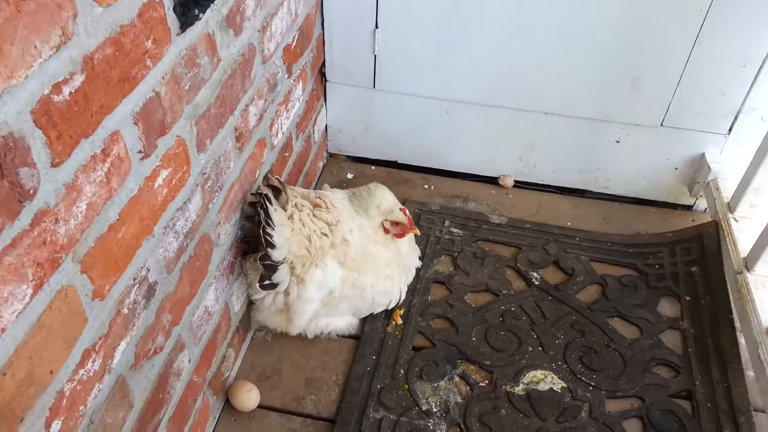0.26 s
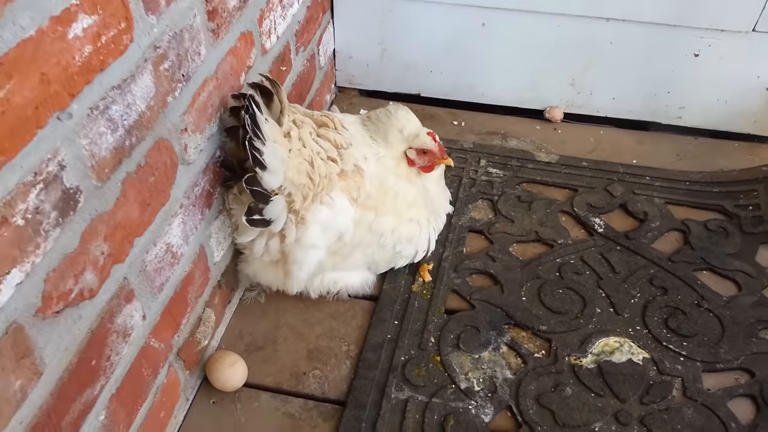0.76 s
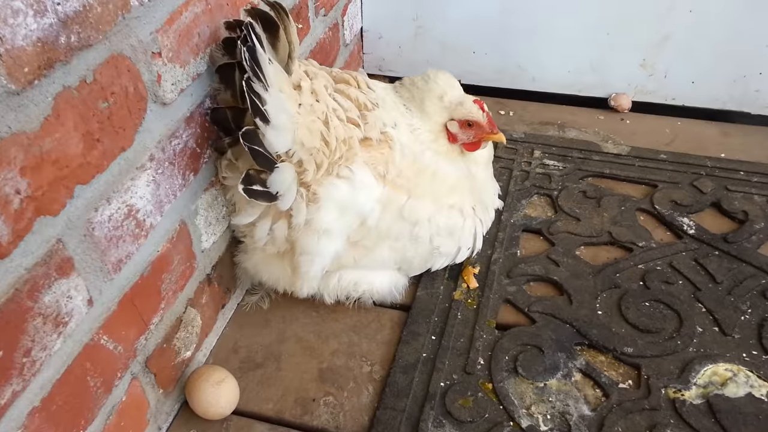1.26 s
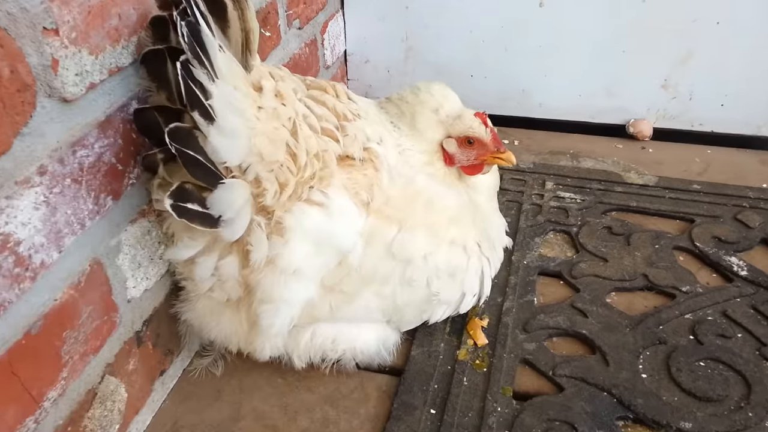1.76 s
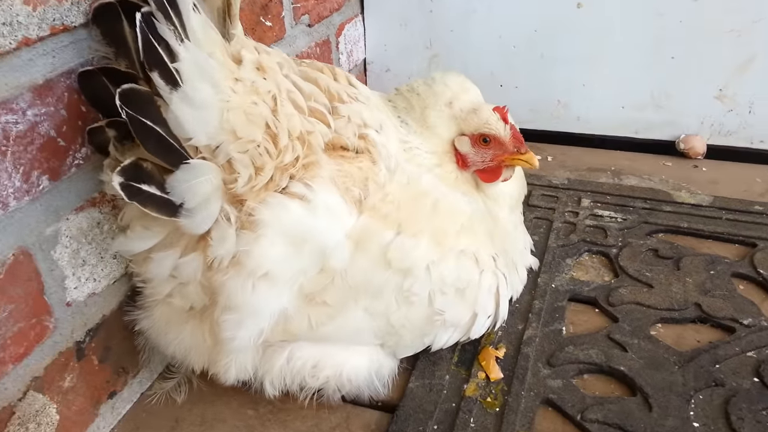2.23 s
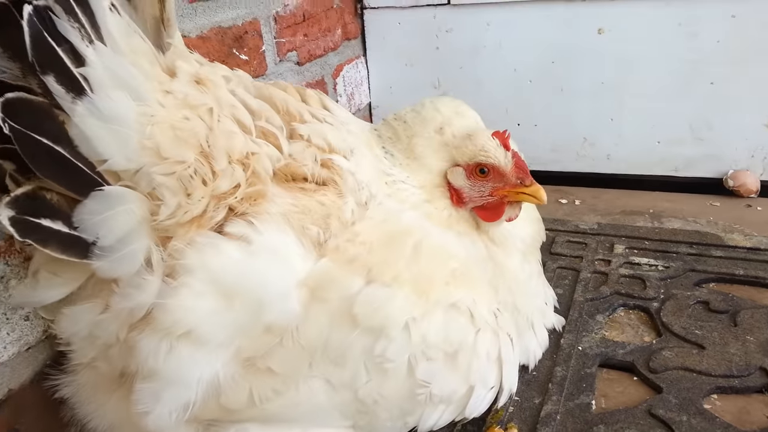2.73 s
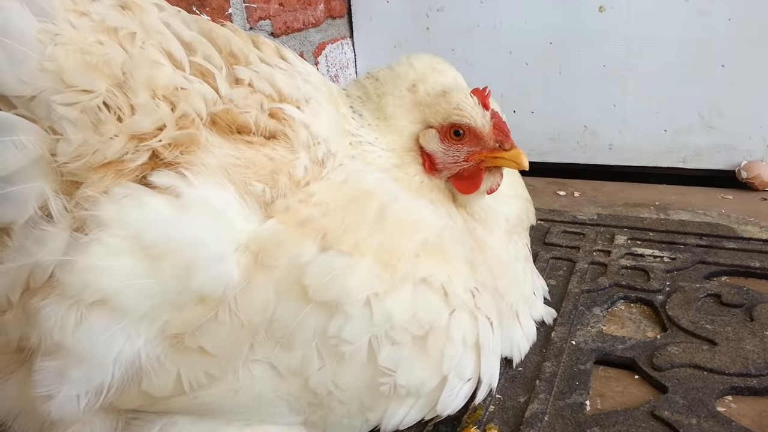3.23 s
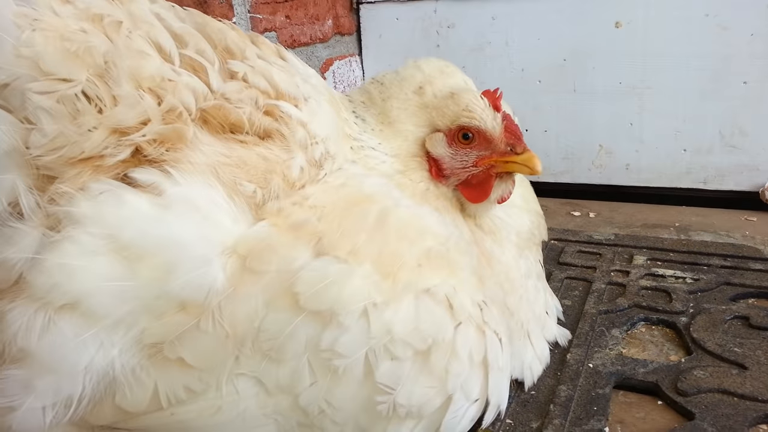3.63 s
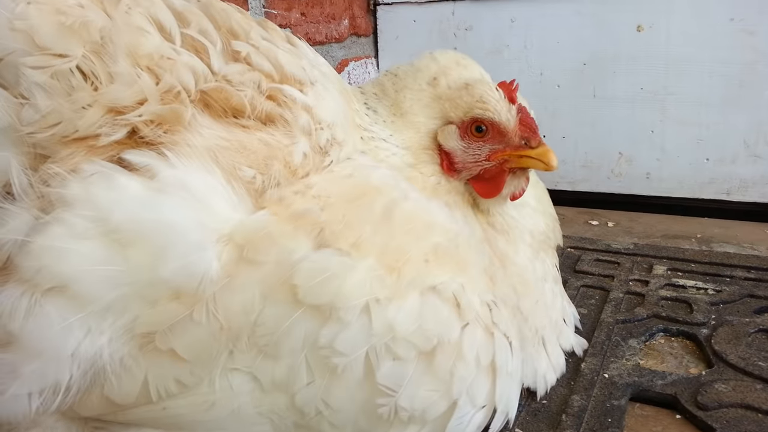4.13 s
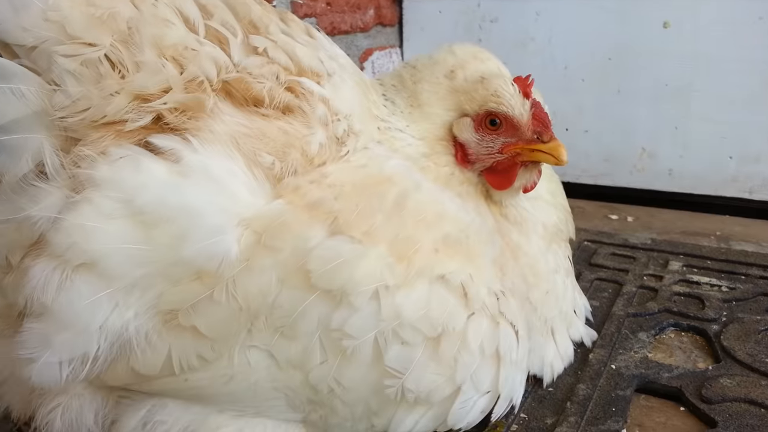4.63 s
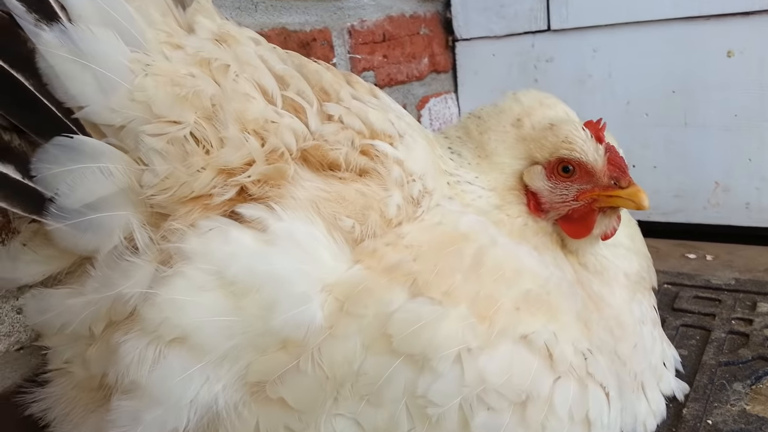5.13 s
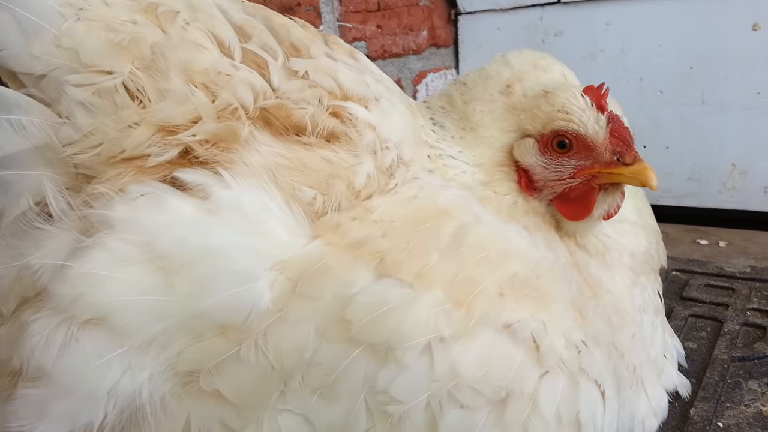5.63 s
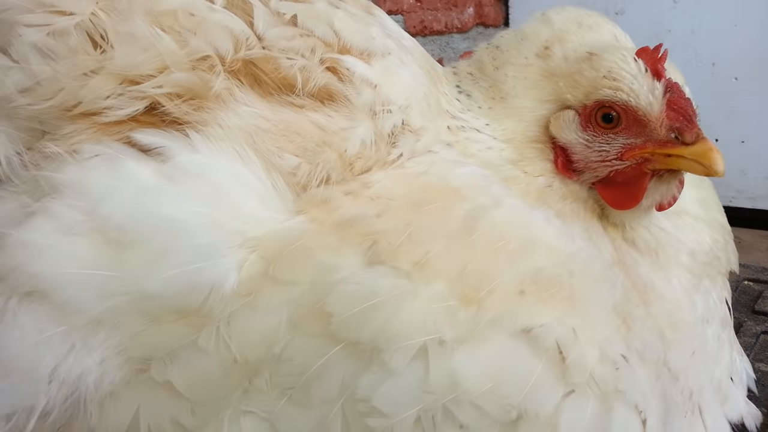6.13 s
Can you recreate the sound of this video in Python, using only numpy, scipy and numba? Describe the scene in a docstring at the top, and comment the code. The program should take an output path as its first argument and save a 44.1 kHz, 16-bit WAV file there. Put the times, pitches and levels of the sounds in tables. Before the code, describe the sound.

A broody hen on a porch gives soft clucks, a swelling throaty wavering moan, then two louder stuttering calls over faint engine idle.

```python
"""A soft outdoor hush, a far engine idling and small rustles come first; then a broody hen on a brick porch calls.
She gives four calls: her breath comes in short throbs, each a note that climbs fast and sags, first as
separate clucks, later fused to a wavering moan. Her voice is harmonics and sharp pulses shaped by throat and beak.
Ticks ring a few resonances, rustles are swells of grainy noise, the engine is thumps ringing a pipe,
the hush is smooth noise; the porch adds a short tail to hen and ticks."""
import sys
import numpy as np
from scipy import signal
from scipy.fft import rfft, irfft
from scipy.io import wavfile
from scipy.ndimage import uniform_filter1d
from numba import njit

SR = 44100
rng = np.random.default_rng(int(sys.argv[2]) if len(sys.argv) > 2 else 0)


def put_to_file(sound):
    """Save the sound as 16-bit audio at rate SR, in the file named by the first command-line argument."""
    columns = np.atleast_2d(sound).T  # one column per channel
    safe = np.clip(columns, -1, 1)
    whole_steps = np.round(safe * 32767)
    wavfile.write(sys.argv[1], SR, whole_steps.astype(np.int16))


N = 281358

# how the throat colours the low harmonics: [f/Hz, level/dB]
THROAT = [(250, -12.5), (350, 6.5), (420, 0), (500, 2.4), (720, 10), (1030, 0.5), (1180, -6), (1330, -25.5),
          (1700, -40)]
# beak resonances, and last a narrow windpipe resonance that also follows the beak opening: [f/Hz, width/Hz,
# level/dB, how far it follows the opening]
BEAK = [(3193, 326, -26, 0.83), (3707, 414, -18.5, 1.65), (4585, 1250, -29, 1.49), (1804, 150, -30.5, 3.18)]
# windpipe resonances: [f/Hz, width/Hz, level/dB, how far it follows the opening]
WINDPIPE = [(1465, 150, -32, 2.04), (1942, 580, -24, 0.74)]
# resonances of whistling air: [f/Hz, width/Hz, level/dB]
WHISTLE = [(6380, 62, -34.5), (8400, 1000, -45.5), (10120, 400, -40.5), (13320, 400, -49)]
# beak resonances shift with its shape: [t/s, share of rest pitch]
BEAK_TUNING = [(1.43, 0.89), (1.7, 0.97), (2.24, 0.98), (2.5, 0.98), (3.15, 0.91), (5.5, 1), (5.7, 0.94)]
# how her voice wavers: [t/s, pitch sag as a share, roughness 0-1]
WAVER = [(.31, .12, .45), (.45, .3, .2), (1.33, 0, .1), (1.37, .22, .15), (1.42, .12, .4), (1.5, .15, .6),
         (1.64, .08, .5), (1.68, .06, .07), (1.79, .07, .1), (1.825, .05, .34), (1.86, .08, .1),
         (1.95, .15, .08), (2.145, .08, .08), (2.165, .15, .5), (2.21, .1, .12), (2.33, .18, .14),
         (2.5, .2, .15), (2.56, .4, .3), (3.1, -.08, .07), (3.15, .2, .05), (3.46, .22, .05),
         (3.52, .36, .08), (3.66, .3, .25), (5.12, .2, .3), (5.16, .25, .1), (5.32, .4, .15),
         (5.47, .38, .25), (5.62, .36, .06), (5.76, .23, .05), (5.92, .33, .15)]
# colour of the voice: [t/s, low overtones level/dB, windpipe level/dB, open beak level/dB, whistling air level/dB]
COLOUR = [(.31, -11.5, -2.5, -5, -5.5), (1.33, -26, -13, -8, 0), (1.43, 8, 11.5, 2.5, -13),
          (1.5, -6.5, 13, -7, -6), (1.62, 2, 16.5, 2.5, 2), (1.8, 20.5, 15, 7.5, 1.5),
          (2.0, -0.5, 3.5, 1.5, -10.5), (2.25, 14, 6, 3.5, -5.5), (2.58, 3, 6.5, -2, 2.5),
          (3.05, 10.5, 1, -4.5, -13), (3.1, 7.5, 8, -1, -3), (3.66, 3.5, -0.5, -9, -3.5),
          (5.09, 8, -3, -6, -3.5), (5.45, -2, -5.5, -9.5, -9), (5.75, -5.5, -4, -8.5, -15.5)]
# the other half of the syrinx (the bird's voice box) sounds its own note: [t/s, f/Hz, level/dB]
SECOND_SIDE = [(1.45, 780, -44), (1.5, 798.5, -34), (1.645, 717.4, -21.5), (1.67, 701.3, -42)]
OVERTONES_FROM_HZ, OVERTONES_FULL_HZ = 743, 1090   # the overtone colour takes hold between these
NO_SAG_BEFORE_DB = 11   # the weaker the next throb, the less this one sags; not at all before a drop this deep
SAG_LIFT_DB = 2.5   # rise in level for a full sag; a wider beak makes it larger
SLACK_DULLS_DB = 34.5   # treble lost in a full sag
HALF_SHARE = 0.045   # how much every second cycle differs, before the beak opening scales it
MOAN_SWELL_DB, SWELL_DB = 2, 4.5   # how far below its top a throb starts: one that runs on, one cut short


def hen():
    """Harmonics of the syrinx pass through throat and beak; rough moments scatter the cycles and add hiss."""
    sag, rough = in_time(WAVER)
    overtones_db, windpipe_db, beak_db, whistle_db = in_time(COLOUR)
    start, level_db, top_hz = throbs()
    progress = np.interp(np.arange(N) / SR, start, np.arange(len(start)))
    throb, part = progress.astype(int), progress % 1   # which throb, and how far through it
    step_db = np.diff(level_db)
    runs_on = np.append(step_db > -12, False)[throb]
    # the final low note is dull and dies away
    last = np.append(level_db[1:] < -60, False)[throb]
    silent = (level_db[throb] < -60) | (progress <= 0)

    # the membranes tighten fast, hold, then slacken; a cluck cut short by a pause ends at full pitch
    sags = np.clip(1 + np.append(step_db, -99) / NO_SAG_BEFORE_DB, 0, 1)[throb]
    tightening = np.clip(1 - np.where(runs_on, 6, 3) * part, 0, 1) ** 1.5
    slackening = sags * np.clip(1.5 * part - .5, 0, 1) ** 1.4
    slack = sag * np.maximum(tightening, slackening)
    pitch = uniform_filter1d(top_hz[throb] * (1 - slack), 70)
    jitter = (.002 + .12 * rough) * wobble(250)
    cycle = 2 * np.pi * np.cumsum(pitch * (1 + jitter)) / SR
    # half-speed wave: every second cycle is stronger, the more so the wider the beak
    uneven = np.clip(HALF_SHARE * from_db(beak_db), 0, .8) * np.cos(cycle / 2)
    shimmer = 1 + rough * wobble(200) + .3 * uneven

    # four smooth harmonics, held at an even level before the breath shapes them
    dull_db = uniform_filter1d(-20. * last, 200)
    low = 0
    for k in (1, 2, 3, 4):
        harmonic_db = at_hz(THROAT, k * pitch)
        if k > 1:
            colour_share = np.interp(k * pitch, [OVERTONES_FROM_HZ, OVERTONES_FULL_HZ], [0, 1])
            harmonic_db = harmonic_db + dull_db + overtones_db * colour_share
        low = low + from_db(harmonic_db) * np.sin(k * (cycle + 1.3) - 1.3)
    low = shimmer * low / np.sqrt(uniform_filter1d(low ** 2, 400) + 1e-9)

    # each closure of the membranes is a sharp pulse, with a puff of turbulent air
    closures = sum(np.cos(k * cycle) for k in range(1, 22)) / 3
    puffs = rng.standard_normal(N) * (1 + .8 * np.cos(cycle))
    buzz = (shimmer + uneven) * closures + (.05 + 2 * rough) * puffs
    high = formants(buzz, WINDPIPE, windpipe_db, np.ones(N))
    high = high + formants(buzz, BEAK, beak_db, in_time(BEAK_TUNING)[0])
    high = high + climbing(buzz)
    high = high + from_db(whistle_db) * resonances(buzz + .5 * puffs, WHISTLE)
    high = above(1450, 5 * high) * uniform_filter1d(from_db(3 - SLACK_DULLS_DB * slack), 100)

    # each throb swells; the breath is slightly louder while the pitch sags
    swell_db = np.where(runs_on, MOAN_SWELL_DB, SWELL_DB) * ~last * np.clip(1 - 0.96 * part, 0, 1)
    sag_lift_db = SAG_LIFT_DB * from_db(beak_db) * slack
    breath = from_db(level_db[throb] + sag_lift_db - 20 * last * part - swell_db) * ~silent
    breath = uniform_filter1d(uniform_filter1d(breath, 200), 120)

    side_hz, side_db = in_time(SECOND_SIDE)
    side_cycle = 2 * np.pi * np.cumsum(side_hz * (1 + 0.0422 * wobble(56))) / SR
    second = from_db(side_db) * shimmer * ~silent * np.sin(side_cycle)
    return above(200, breath * (low + high) + second)


# the four calls, each row starting on a beat:
# [t/s, level/dB, top pitch f/Hz, off-beat minus beat level/dB, share of the beat before the off-beat]
VOICE = [
    [(.315, -31.5, 513, -8.5, 0.55), (.38, -29.5, 526, -6.5, 0.33), (.472, -22, 537.3, -2.5, 0.62),
     (.564, -26.5, 505.5, 0, 0.65), (.657, -25.5, 525, -4, 0.49), (.701, -29.5, 472, 2.5, 0.78)],
    [(1.375, -24, 553, -6.5, 0.4), (1.42, -23.5, 559, -5, 0.49), (1.546, -30.5, 582.6, 5.5, 0.64),
     (1.608, -22.5, 623.2, 2.5, 0.88), (1.657, -21.5, 591.8, -8.5, 0.69), (1.785, -20.5, 627, 7.5, 0.61),
     (1.832, -13.5, 619, -2.5, 0.4), (1.876, -15.5, 601, -0.5, 0.56), (1.924, -19.5, 536, 1, 0.64),
     (2.015, -18.5, 561.5, 1, 0.41), (2.103, -15, 588, -1.5, 0.56), (2.152, -14.5, 640.8, 2.5, 0.5),
     (2.246, -10, 589.3, -3, 0.56), (2.295, -12.5, 527, -1, 0.6), (2.339, -15.5, 532.4, 0, 0.47),
     (2.43, -13, 594.4, 1, 0.36), (2.479, -11, 566.3, -2.5, 0.4), (2.524, -14, 454, -4.5, 0.65)],
    [(3.043, -15.5, 588, -26, 0.29), (3.096, -7.5, 543.4, -28.5, 0.39), (3.154, -5, 536.5, -23, 0.36),
     (3.251, -6, 545.7, -30.5, 0.42), (3.302, -7.5, 529, -6, 0.53), (3.499, -8, 507.7, -4, 0.54),
     (3.546, -11.5, 482.4, 0.93, 0.51), (3.598, -16.5, 457.6, 0, 0.96), (3.622, -17, 328.6, -3, 0.91)],
    [(5.101, -16.5, 521.4, -15, 0.35), (5.159, -11.5, 523.5, -40, 0.36), (5.205, -9, 510.2, -19, 0.38),
     (5.252, -9.5, 524.5, -4.5, 0.63), (5.327, -9, 515, -2, 0.74), (5.42, -9, 502, -4.5, 0.7),
     (5.471, -14, 480.5, -3.5, 0.5), (5.524, -12.5, 490, -0.5, 0.51), (5.62, -14, 498.7, -2, 0.57),
     (5.726, -14, 529.7, 2, 0.46), (5.823, -14.5, 500.3, -2.5, 0.4), (5.863, -14.5, 457.4, -1.5, 0.72)],
]
# the breath stops briefly after a beat, until the next throb: [t/s]
PAUSES = [.444, .49, .537, .582, .626, .672, 3.371, 3.422, 3.472, 3.521, 5.278, 5.338, 5.387, 5.437]
# a high note opens a loud call: [t/s, level/dB]
LEAD_INS = [(1.329, -37), (3.032, -26.5), (5.092, -20)]
# a low note closes each call: [t/s, level/dB, pitch f/Hz, length/s]
ENDINGS = [(0.731, -32.5, 279.1, 0.031), (2.557, -27.5, 328.5, 0.05), (3.65, -26, 316, .03),
           (5.892, -32.5, 342, 0.084)]
LEAD_IN_HZ = 700.8
BEAT_S = .05   # beats fill the time between rows evenly, about this far apart
PAUSE_DB, SILENCE_DB = -31.5, -70   # pause against the beat; level after a call


def throbs():
    """Breath pulses as beat and off-beat through each call: start, level and top pitch."""
    rows = [(s, db, LEAD_IN_HZ) for s, db in LEAD_INS]
    for call, (end, end_db, end_hz, length) in zip(VOICE, ENDINGS):
        s, db, hz, off_db, share = np.transpose(call)
        steps = np.maximum(np.round(np.diff(s) / BEAT_S), 1)
        number = np.cumsum(np.append(0, steps))
        beats = np.interp(np.arange(number[-1] + 1), number, s)
        rows += zip(beats, np.interp(beats, s, db), np.interp(beats, s, hz))

        shares = np.clip(np.interp(beats, s, share), .2, 1)
        offs = beats + shares * np.diff(np.append(beats, end))
        off_rows = zip(offs, np.interp(beats, s, db + off_db), np.interp(offs, s, hz))
        # a beat that takes nearly all its time has no off-beat
        rows += [row for row, part in zip(off_rows, shares) if part <= .9]

        for t in PAUSES:
            if s[0] < t < end:
                rows.append((t, np.interp(t, s, db) + PAUSE_DB, np.interp(t, s, hz)))
        rows += [(end, end_db, end_hz), (end + length, SILENCE_DB, end_hz)]
    return np.transpose(sorted(rows))


def formants(x, modes, opening_db, tuning):
    """Steep resonances, each passed twice, grow with the opening and slide with the tuning."""
    out = 0
    for k, (hz, width_hz, db, follows) in enumerate(modes):
        once = sliding(x, hz * tuning, width_hz, SR)
        twice = sliding(once, hz * tuning, width_hz, SR)
        out = out + (-1) ** k * from_db(db + follows * opening_db) * twice
    return out


# one resonance climbs as the beak opens: [t/s, f/Hz, level/dB]
BEAK_OPENS = [(1.5, 2135, -60), (1.53, 2328, -16), (1.64, 2758, -10), (1.67, 3525, -70)]


def climbing(x):
    """One resonance rises while the beak opens."""
    hz, db = in_time(BEAK_OPENS)
    return from_db(db) * sliding(x, hz, 290, SR)   # 290 Hz wide


# dry ticks nearby: [t/s, level/dB before a fixed lift and the ringing]
TICKS = [(3.7838, -37), (4.1879, -34), (4.2412, -37), (4.2585, -36), (4.2637, -28), (5.1497, -17),
         (6.1444, -38)]
# what a single tick rings: [f/Hz, width/Hz, level/dB]
TICK_MODES = [(1500, 1900, -7.5), (3380, 1200, -15)]
# what the even run of ticks rings, passed twice: [f/Hz, width/Hz, level/dB]
RATCHET_RING = [(3500, 1100, 4)]
RATCHET_S, RATCHET_PER_S, RATCHET_DB, RATCHET_TICKS = 4.2292, 30, -12, 13   # start, rate, mean level, count


def ticks():
    """Clicks ring a few broad modes; the even run rings higher, each tick with its own strength."""
    s, db = np.transpose(TICKS)
    clicks, run = np.zeros((2, N))
    clicks[np.round(s * SR).astype(int)] = from_db(db + 20)
    clicks = uniform_filter1d(clicks, 5) * 5   # five samples wide
    run_s = RATCHET_S + np.arange(RATCHET_TICKS) / RATCHET_PER_S
    run[np.round(run_s * SR).astype(int)] = from_db(rng.normal(RATCHET_DB, 2, RATCHET_TICKS))
    ratchet = resonances(resonances(run, RATCHET_RING), RATCHET_RING)
    return resonances(clicks, TICK_MODES) + ratchet


# rustles: [middle t/s, half length/s, level/dB, lowest f/Hz, highest f/Hz]
RUSTLES = [(0.067, 0.11, -45.5, 487, 4070), (0.197, 0.25, -44, 345, 2574), (4.058, 0.013, -33.5, 910, 4400),
           (4.42, .36, -43, 725, 4300), (4.428, 0.1, -44, 1230, 14000), (4.841, 0.049, -41, 1410, 5560)]


def rustles():
    """Short swells of grainy noise, partly alike in both ports."""
    out, t = np.zeros((2, N)), np.arange(N) / SR
    for s, length, db, low_hz, high_hz in RUSTLES:
        near = np.abs(t - s) < length
        shared, *own = rng.standard_normal((3, near.sum()))
        # the shared noise also swings the level by decibels, which makes the grain
        grainy = (np.array(own) + 0.4 * shared) * from_db(shared)
        band = signal.butter(2, [low_hz, high_hz], "band", fs=SR, output="sos")
        swell = np.exp(-(3 * (t[near] - s) / length) ** 2)
        out[:, near] += from_db(db) * rms_one(signal.sosfilt(band, grainy)) * swell
    return out


# colour of the two microphone ports: [f/Hz, left minus right level/dB]
PORT_BALANCE = [(60, -7), (550, -4.5), (1650, -6.5), (4970, -4.5), (15000, 33)]
# how far the left port leads: [f/Hz, phase/radians]
PORT_LEAD = [(0, 0), (900, .8), (2400, 1.8), (3600, 1.9), (10000, 5.0)]


def ports(x):
    """The two ports hear a near source with their own colour and delay."""
    hz = np.fft.rfftfreq(N, 1 / SR)
    lead = np.interp(hz, *np.transpose(PORT_LEAD))
    half = from_db(at_hz(PORT_BALANCE, hz) / 2) * np.exp(.5j * lead)
    return np.array([irfft(rfft(x) * half, N), irfft(rfft(x) / half, N)])


PORCH_T60_S, PORCH_DB = 0.14, -1.5   # time for the tail to fall 60 dB; its level
WALLS_DIFFER_HZ = 663   # below this both ports hear much the same tail


def porch(x):
    """Wall, door and boards throw back a short tail, different in each channel above the lows."""
    t = np.arange(SR // 4) / SR
    tail = rng.standard_normal((2, len(t))) * from_db(-60 * t / PORCH_T60_S) * (t > .004)
    tail = signal.lfilter([1, -.75], [1], tail)   # hard brick favours the treble
    tail[1] = tail[0] + above(WALLS_DIFFER_HZ, tail[1] - tail[0])
    return signal.fftconvolve(x[None], tail / np.linalg.norm(tail[0]), axes=1)[:, :N]


# exhaust pipe resonances: [f/Hz, width/Hz, level/dB]
EXHAUST = [(79.9, 4.2, 6), (99.3, 2.9, 4), (128, 8.2, -2.5)]
# the idle comes and goes: [t/s, level/dB]
ENGINE_SWELL = [(0, -6.5), (1.3, -6), (2.6, -1), (5.2, -1), (6.3, -2.5)]
FIRINGS_PER_S, FIRST_FIRING_S, ENGINE_DB = 10.81, 0.022, -45.5   # level before the swell


def engine():
    """One uneven exhaust thump per firing rings the pipe."""
    count = int(N / SR * FIRINGS_PER_S)
    late, strength = rng.standard_normal((2, count))
    at = FIRST_FIRING_S + np.arange(count) / FIRINGS_PER_S + 0.0011 * late
    thumps = np.zeros(N)
    thumps[np.clip((at * SR).astype(int), 0, N - 1)] = from_db(2 * strength)
    return from_db(ENGINE_DB + in_time(ENGINE_SWELL)[0]) * rms_one(resonances(thumps, EXHAUST))


# shape of the outdoor hush: [f/Hz, relative level/dB per Hz]
AIR = [(40, -21.5), (86, -7), (306, -16), (612, -14), (1460, -21), (4200, -22.5), (5200, -26), (12000, -31)]
# how loud its treble is, before a fixed 5 dB lift: [t/s, level/dB]
AIR_DB = [(0, -57.5), (2.7, -52.5), (3.8, -58.5), (6.38, -60.5)]
# how alike left and right are: [f/Hz, likeness 0-1]
AIR_LIKENESS = [(60, 0.84), (380, 0.31), (2380, 0.021)]


def air():
    """Far traffic and leaves: smooth noise, much alike in both ports only in the bass."""
    hz = np.fft.rfftfreq(N, 1 / SR)
    mid, side = rfft(rng.standard_normal((2, N))) * from_db(at_hz(AIR, hz))
    alike = at_hz(AIR_LIKENESS, hz)
    both = np.sqrt(1 + alike) * mid + np.sqrt(1 - alike) * side * [[1], [-1]]
    treble = np.sqrt(np.mean(irfft(both * (hz > 1500), N) ** 2))
    return from_db(in_time(AIR_DB)[0] + 5.0) * irfft(both, N) / treble


def from_db(db):
    """Decibels to gain."""
    return 10 ** (np.asarray(db) / 20)


def rms_one(x):
    """Scale to an average (rms) level of 1."""
    return x / np.sqrt(np.mean(x ** 2) + 1e-20)


def in_time(rows):
    """Columns of a curve over time, one value per sample."""
    s, *columns = np.transpose(rows)
    return [np.interp(np.arange(N) / SR, s, c) for c in columns]


def at_hz(points, hz):
    """Read a spectrum on a log-frequency axis."""
    f, value = np.transpose(points)
    return np.interp(np.log(hz + 20), np.log(f + 20), value)


def wobble(rate_hz):
    """Random wander up to about rate_hz, spread 1."""
    slow = signal.butter(2, rate_hz, fs=SR, output="sos")
    return rms_one(signal.sosfilt(slow, rng.standard_normal(N)))


def resonances(x, modes):
    """Parallel resonances with alternating signs; a narrower one rings longer."""
    out = 0
    for k, (hz, width_hz, db) in enumerate(modes):
        r = np.exp(-np.pi * width_hz / SR)
        feed = np.array([1, 0, -1]) * (1 - r * r) / 2
        ring = [1, -2 * r * np.cos(2 * np.pi * hz / SR), r * r]
        out = out + (-1) ** k * from_db(db) * signal.lfilter(feed, ring, x + 1e-18)
    return out


@njit
def sliding(x, hz, width_hz, rate):
    """A resonance whose centre moves from sample to sample."""
    out, r = np.zeros_like(x), np.exp(-np.pi * width_hz / rate)
    for i in range(2, len(x)):
        feed = (1 - r * r) / 2 * (x[i] - x[i - 2])
        ring = 2 * r * np.cos(2 * np.pi * hz[i] / rate) * out[i - 1] - r * r * out[i - 2]
        out[i] = feed + ring
    return out


def above(hz, x):
    """Steep high-pass."""
    return signal.sosfilt(signal.butter(3, hz, "high", fs=SR, output="sos"), x)


# she turns her head; the ticks share this balance: [t/s, left minus right level/dB]
FACING = [(.5, 3.5), (3.1, 3.5), (3.6, 2.5), (5.2, 5.5), (5.8, 7)]


def scene():
    """Hen and ticks with the porch's tail, then rustles, engine and air."""
    near = hen() + ticks()
    facing = from_db(in_time(FACING)[0] * [[.5], [-.5]])
    close = facing * ports(near) + from_db(PORCH_DB) * porch(near)
    return close + rustles() + engine() + air()


CUTOFF_HZ = 15600


def record(dry):
    """The microphones lose the deepest bass, peaks beyond the limit are flattened, the top is cut."""
    dry = np.clip(above(55, dry), -.97, .97)
    return signal.sosfilt(signal.cheby2(12, 70, CUTOFF_HZ, fs=SR, output="sos"), dry)


dry = scene()
out = record(dry)
put_to_file(out)
```